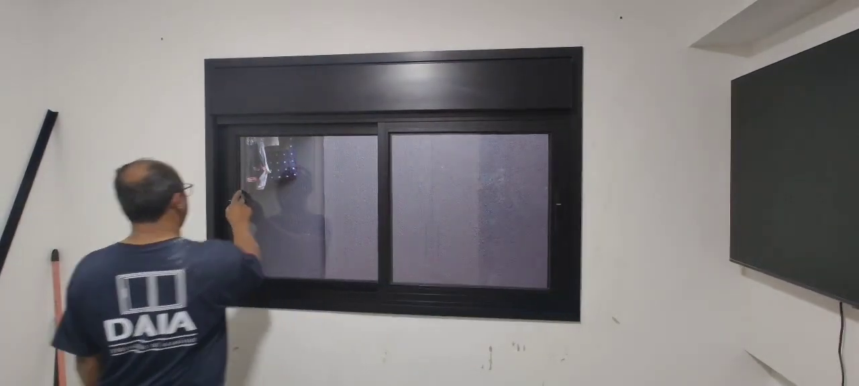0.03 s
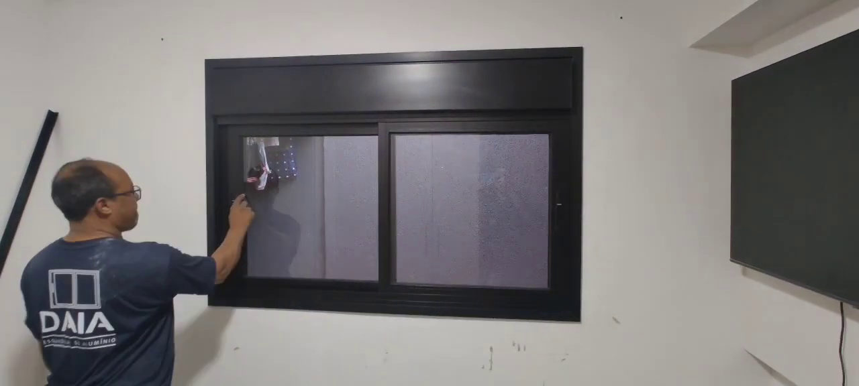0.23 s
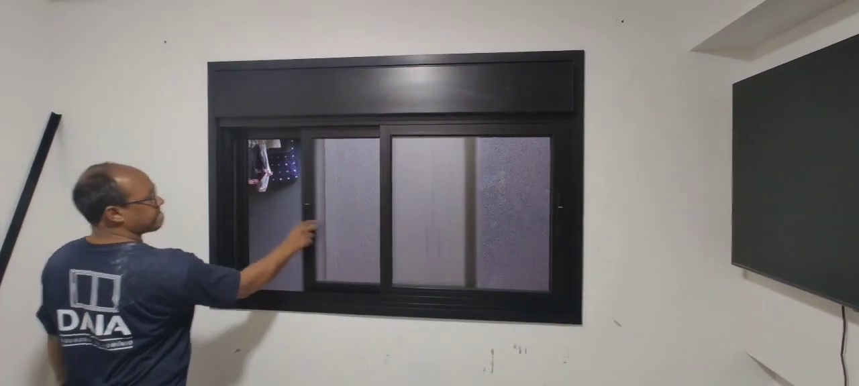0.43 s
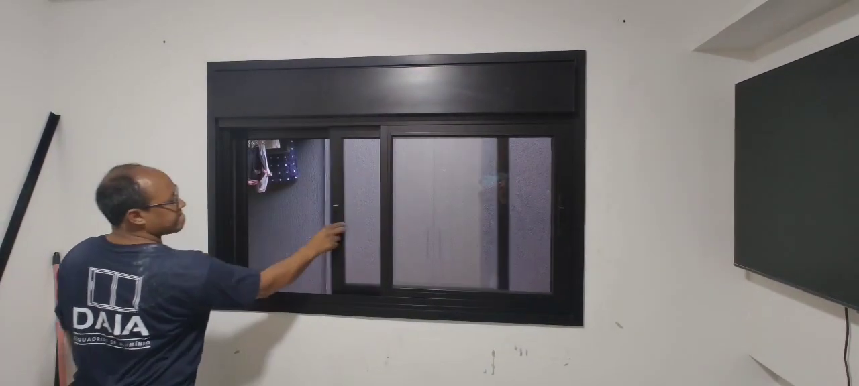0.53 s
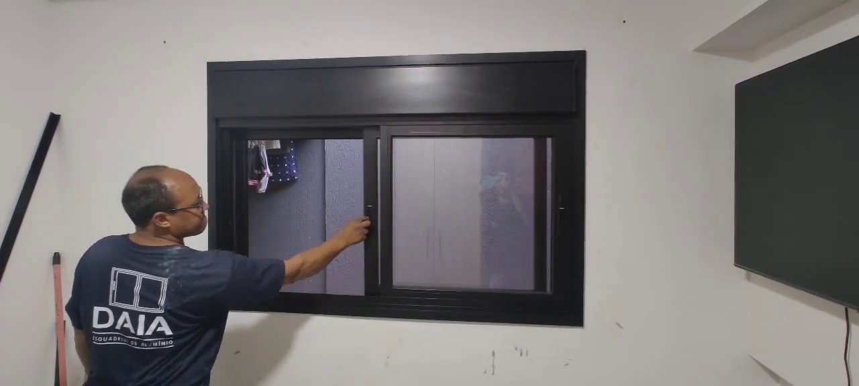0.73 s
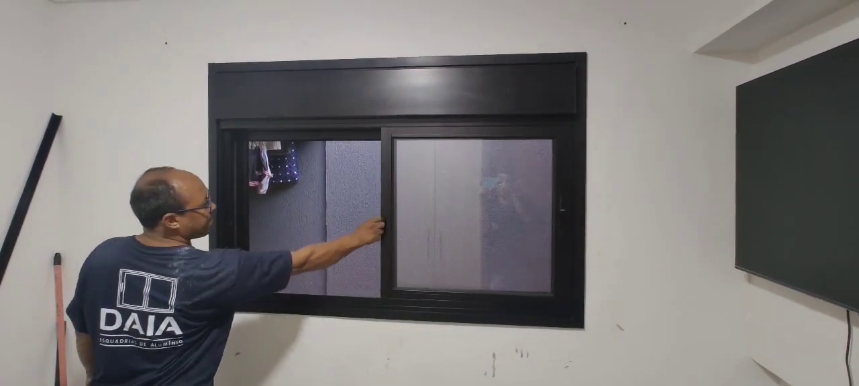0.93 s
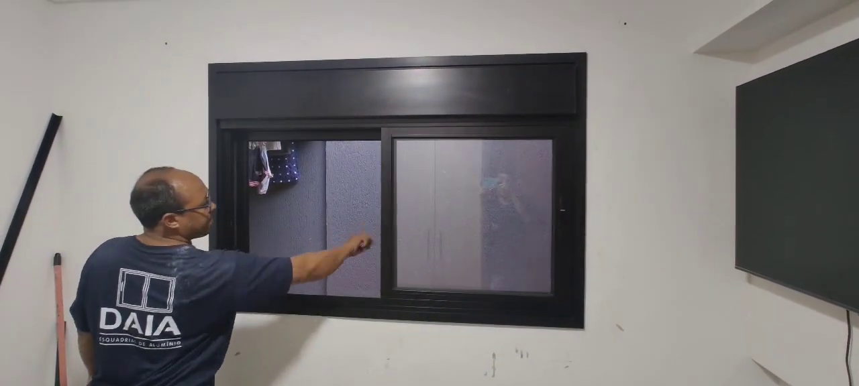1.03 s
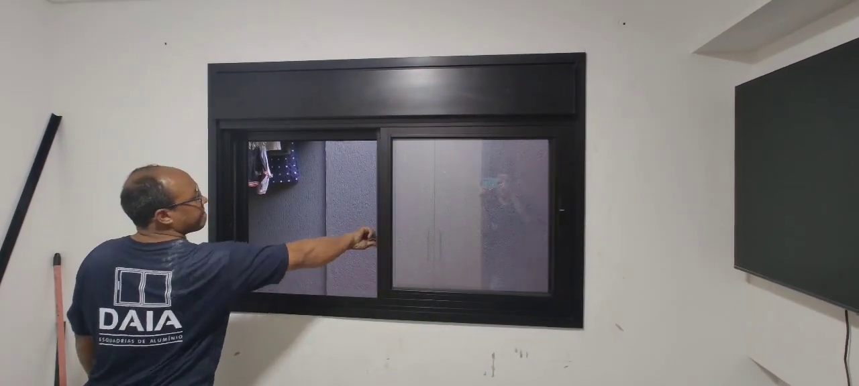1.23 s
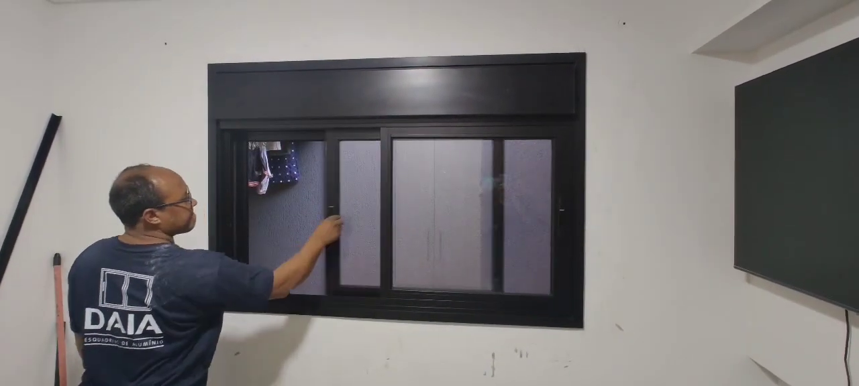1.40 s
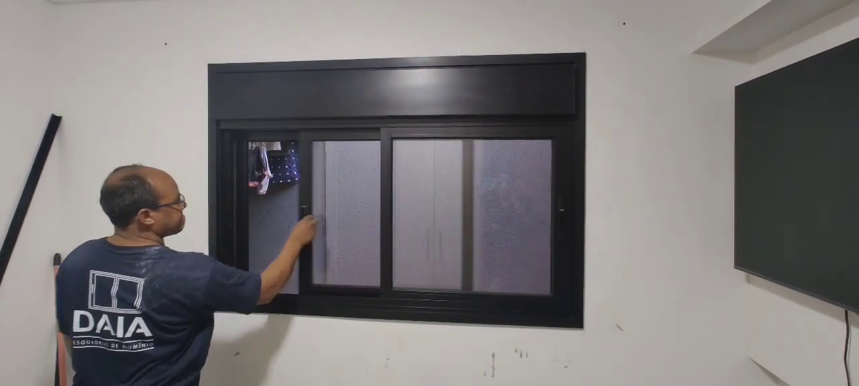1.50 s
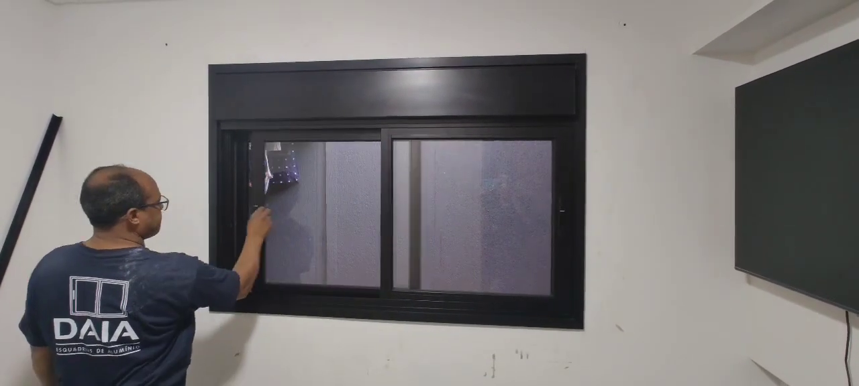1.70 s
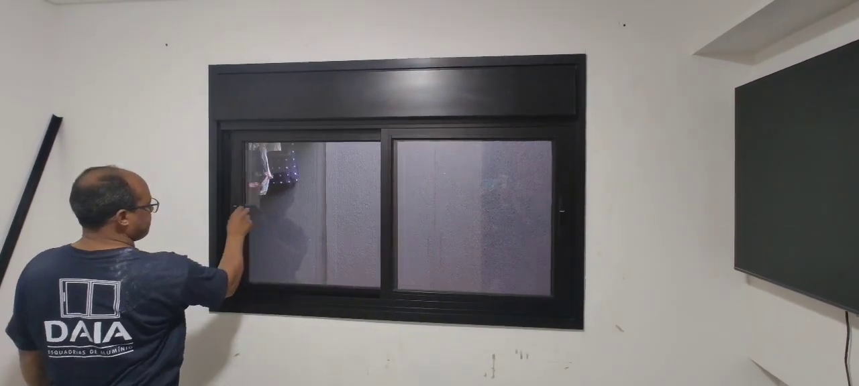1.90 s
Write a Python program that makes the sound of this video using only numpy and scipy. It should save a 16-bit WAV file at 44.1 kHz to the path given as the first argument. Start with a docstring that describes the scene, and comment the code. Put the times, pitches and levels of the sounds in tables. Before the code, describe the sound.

A metal window slides open and shut in a bare room. It clatters free, rolls with a gritty rumble and hiss, squeaks briefly, then rolls back and knocks into the frame. Heard on the right, a few metres away.

```python
"""A bare room: a metal window sash, a few metres off, slides open and shut.
A hand works the catch and the sash breaks free with a short clatter. Its rollers grate and rumble
on the track, its brush seal hisses, its weight thumps the frame. A roller squeaks late in the
opening; on the way back the sash knocks into the frame. All on the right; faint hiss on the left."""
import sys
import numpy as np
from scipy import signal
from scipy.fft import rfft, irfft
from scipy.io import wavfile
from scipy.ndimage import uniform_filter1d

SR = 44100
rng = np.random.default_rng(int(sys.argv[2]) if len(sys.argv) > 2 else 0)


def store_wav(level_fs):
    """Save 16-bit WAV to argv[1]."""
    pcm = np.round(np.clip(np.atleast_2d(level_fs), -1, 1) * 32767)
    wavfile.write(sys.argv[1], SR, pcm.T.astype(np.int16))


N = 85995
TIME = np.arange(N) / SR

# modes of sash and pane: f/Hz, width/Hz, level/dB
SASH_MODES = [(222.2, 17, 5.5), (267, 20, 0.5), (385.3, 26, -1.5), (505, 50, -0.5), (600, 52, -2),
              (762, 10, -7.5), (1462, 47, -5), (1896, 48, -4.5), (2028, 68, -6.5), (2834, 44, -4.5),
              (3870, 73, -5)]
# spectrum of contacts on the sash: f/Hz, level/dB
CONTACT_SPECTRUM = [(40, -42), (120, -25), (220, -12), (450, -11.5), (750, -1.5), (1100, -5.5), (2000, -3),
                    (2900, -1.5), (4600, -4.5), (6000, -0.5), (7500, -5.5), (10000, -11.5), (13000, -20),
                    (15700, -35)]


def amp(db):
    """Decibels to gain."""
    return 10 ** (np.asarray(db) / 20)


def unit(x):
    """Scale to rms 1."""
    return x / np.sqrt(np.mean(x ** 2) + 1e-20)


def log_interp(points, hz):
    """Interpolate a table over log frequency."""
    f, value = np.transpose(points)
    return np.interp(np.log(hz + 1), np.log(f + 1), value)


def envelope(rows, column=1):
    """Gain over time from a dB column; silent outside the table."""
    rows = np.array(rows)
    return amp(np.interp(TIME, rows[:, 0], rows[:, column], left=-140, right=-140))


def colour(x, spectrum, modes=(), tilt_db_oct=0):
    """Filter by a tilted spectrum and resonant modes; output rms 1."""
    hz = np.fft.rfftfreq(2 * N, 1 / SR)
    octaves = np.log2(np.maximum(hz, 200) / 1000)
    gain = amp(log_interp(spectrum, hz) + tilt_db_oct * octaves)
    resonance = 1 + sum(amp(db) / (1 + 2j * (hz - f) / width) for f, width, db in modes)
    return unit(irfft(rfft(x, 2 * N) * gain * resonance)[:N])


def impacts(per_s, spread_db):
    """Random tiny impacts of uneven size."""
    size = amp(spread_db * np.minimum(rng.exponential(1, N), 4))
    return unit(size * rng.choice([-1, 1], N) * (rng.random(N) < per_s / SR))


def wander(cutoff_hz):
    """Low-passed noise, rms 1."""
    return unit(signal.sosfilt(signal.butter(2, cutoff_hz, fs=SR, output="sos"), rng.standard_normal(N)))


def background():
    """Quiet, steady noise, mostly low."""
    # f/Hz, level/dB
    spectrum = [(25, -53), (90, -12), (150, 9), (280, 5), (450, 4.5), (800, -2.5), (1200, -3),
                (3000, -13.5), (7000, -8), (11000, -19.5), (15700, -25)]
    return amp(-65) * colour(rng.standard_normal(N), spectrum)


def handling():
    """Hand and catch rub faintly on the sash."""
    # work at the catch, then a change of grip between strokes: t/s, level/dB
    rubbing = [(0, -53), (0.06, -60.5), (0.12, -54), (0.165, -59), (0.19, -48.5), (0.22, -40), (0.3, -86),
               (1.115, -74), (1.155, -60), (1.19, -80)]
    return envelope(rubbing) * colour(impacts(per_s=5000, spread_db=2.1), CONTACT_SPECTRUM, SASH_MODES)


def frame_rings(rise_s=0.01, jitter=0.044):
    """Single frame modes ring as the sash is gripped, freed and stopped."""
    # t/s, f/Hz, level/dB, t60/s
    rings = [(0.04, 880, -52, .15), (0.193, 776, -39, 0.2), (0.99, 885, -58, 0.74)]
    out = np.zeros(N)
    for start, hz, db, t60 in rings:
        age = np.maximum(TIME - start, 0)
        phase = 2 * np.pi * np.cumsum(hz * (1 + jitter * wander(55))) / SR
        out += amp(db - 60 * age / t60) * np.minimum(age / rise_s, 1) * np.sin(phase)
    return out


def knocks():
    """Sash and catch knock: each a dying clatter of contacts that rings the sash."""
    # t/s, level/dB, rise/s, t60/s, tilt/(dB/octave), cutoff/Hz
    hits = [(0.066, -45, 0.018, 0.17, 1.5, 10000), (0.190, -27.5, .018, 0.19, -0.5, 10900),
            (0.223, -29, 0.0099, 0.24, 1, 2920), (1.222, -45.5, 0.016, 0.055, -1, 6040),
            (1.399, -38, 0.0033, 0.05, 0, 8000), (1.650, -31, 0.0027, 0.064, 3, 15000),
            (1.792, -42.5, 0.0026, .06, -1, 8000)]
    out = np.zeros(N)
    for start, db, rise, t60, tilt, cutoff in hits:
        age = TIME - start
        shape = np.clip(age / rise, 0, 1) ** 2 * amp(-60 * np.maximum(age - rise, 0) / t60)
        contacts = signal.lfilter(*signal.butter(2, cutoff, fs=SR), impacts(per_s=14000, spread_db=0.74))
        out += amp(db) * shape * colour(contacts, CONTACT_SPECTRUM, SASH_MODES, tilt)
    return out


def bristles(tilt_db_oct=0):
    """Dense flicks of the brush seal merge into hiss."""
    # f/Hz, level/dB
    spectrum = [(100, -57), (1500, -34), (4000, -7), (5200, -4.5), (6200, -0.5), (6900, -0.5), (7800, -6.5),
                (9800, -11), (11000, -16.5), (13500, -23), (15700, -34)]
    return colour(impacts(per_s=20000, spread_db=2), spectrum, tilt_db_oct=tilt_db_oct)


def slide(sing_hz=7080, sing_width_hz=1050):
    """Grit and bumps under the rollers shake the sash; the seal brushes the frame."""
    # opening stroke: t/s, grating/dB, rumble/dB, seal/dB
    opening = [(0.28, -51, -50, -58), (0.308, -57.5, -48, -51.5), (0.326, -49, -53.5, -44.5),
               (0.414, -41.5, -44, -44), (0.45, -42.5, -47, -42), (0.49, -43, -41.5, -42.5),
               (0.574, -46, -51.5, -44), (0.672, -46.5, -54.5, -46), (0.782, -51, -61, -55),
               (0.854, -48, -57.5, -47.5), (0.894, -49, -54.5, -51), (0.932, -53.5, -64.5, -53.5),
               (0.958, -52.5, -65, -49.5), (0.994, -78, -67, -74), (1.038, -66, -67, -71),
               (1.1, -81, -69, -96)]
    # closing stroke: t/s, grating/dB, rumble/dB, seal/dB
    closing = [(1.22, -81, -73, -89), (1.232, -62, -63, -64.5), (1.25, -60.5, -56, -63.5),
               (1.288, -59, -65, -57.5), (1.31, -49.5, -59, -44.5), (1.362, -47, -46, -42),
               (1.408, -46.5, -40.5, -41.5), (1.43, -49, -48, -45), (1.642, -50, -52, -48),
               (1.652, -47, -44.5, -44.5), (1.704, -62.5, -67.5, -58.5), (1.806, -55.5, -54.5, -51.5),
               (1.876, -63.5, -78, -62.5), (1.908, -72, -79, -75), (1.92, -77, -92, -85),
               (1.95, -95, -76, -106)]
    # track grating: f/Hz, level/dB
    grit_spectrum = [(25, -52), (150, -24), (350, -1.5), (550, 5.5), (740, 8), (1000, 3.5), (1250, 0),
                     (1500, 3.5), (2100, 2.5), (3500, 0), (5000, -8), (9000, -33), (16000, -54)]
    # roller rumble: f/Hz, level/dB
    bump_spectrum = [(25, -59), (60, -18.5), (110, -13), (150, -2.5), (205, 0), (300, 1), (400, -5),
                     (700, -20), (2000, -38)]
    grating = colour(impacts(per_s=2500, spread_db=0), grit_spectrum, SASH_MODES)
    rumble = colour(impacts(per_s=500, spread_db=4.5), bump_spectrum, SASH_MODES)
    seal_opening = bristles()
    # stroked shut, the bristles sing and are brighter
    singing = unit(signal.lfilter(*signal.iirpeak(sing_hz, sing_hz / sing_width_hz, SR), bristles()))
    seal_closing = unit(bristles(tilt_db_oct=2.5) + amp(-2.5) * singing)
    return (amp(9) * grating * (envelope(opening, 1) + envelope(closing, 1))
            + amp(4) * rumble * (envelope(opening, 2) + envelope(closing, 2))
            + amp(7) * (seal_opening * envelope(opening, 3) + seal_closing * envelope(closing, 3)))


def thumps(rise_s=0.0042):
    """The sash's weight thumps the frame as it starts, stops or jolts."""
    # t/s, level/dB, t60/s
    jolts = [(0.309, -52.5, 0.086), (0.947, -48, 0.15), (1.667, -47.5, 0.087), (1.765, -52, 0.14)]
    # f/Hz, level/dB
    spectrum = [(25, -28), (60, -15), (110, -4), (150, 8.5), (230, -6.5), (400, -18), (800, -42),
                (3000, -60)]
    shape = np.zeros(N)
    for start, db, t60 in jolts:
        age = np.maximum(TIME - start, 0)
        shape += amp(db - 60 * age / t60) * np.minimum(age / rise_s, 1)
    return shape * colour(rng.standard_normal(N), spectrum)


def squeak(jitter=0.023, smear_hz=118, flutter_db=1.5):
    """Roller stick-slip: a tone that sags, jumps back up and turns hoarse."""
    # t/s, f/Hz, level/dB, roughness/(0-1)
    contour = [(0.702, 720, -55, 0.3), (0.737, 644.4, -39, .4), (0.75, 612.6, -46, 0.4),
               (0.753, 608.7, -31.5, 0.24), (0.769, 559.6, -27, 0.24), (0.779, 481, -34.5, 0.4),
               (0.782, 479, -28, 0.2), (0.794, 481.8, -26, .1), (0.812, 482.3, -33.5, 0),
               (0.832, 487, -50, 0.3), (0.846, 704, -43, 0.23), (0.877, 706, -41.5, .55),
               (0.916, 690, -41, 0.38), (0.939, 717, -39, 0), (0.948, 606, -52, 0.2),
               (0.965, 630, -88, 0.3)]
    times, hz, _, roughness = np.transpose(contour)
    pitch_hz = np.interp(TIME, times, hz) * (1 + jitter * wander(157))
    phase = 2 * np.pi * np.cumsum(pitch_hz) / SR
    clean = unit(np.sin(phase) + amp(-26) * np.sin(3 * phase))
    hoarse = unit(wander(smear_hz) * np.sin(phase) + wander(smear_hz) * np.cos(phase))
    rough = np.interp(TIME, times, roughness)
    tone = ((1 - rough) * clean + rough * hoarse) / np.hypot(1 - rough, rough)
    fluttering = unit(tone * amp(flutter_db * wander(130)))
    highpass = signal.butter(6, 410, "high", fs=SR, output="sos")
    return signal.sosfiltfilt(highpass, amp(5.5) * envelope(contour, 2) * fluttering)


def left_hiss(right, floor_db=-75, swell_db=-66.5, knee_db=-36.5):
    """Faint hiss that swells when the right channel is loud."""
    # f/Hz, level/dB
    spectrum = [(25, -32), (60, -6.5), (125, 12.5), (250, 10), (600, 6.5), (1200, 2.5), (3000, -0.5),
                (8000, -2), (14000, -3.5), (15700, -14)]
    right_rms = np.sqrt(abs(uniform_filter1d(right ** 2, size=900)))
    swell = amp(swell_db) * np.tanh(right_rms / amp(knee_db))
    return np.hypot(swell, amp(floor_db)) * colour(rng.standard_normal(N), spectrum)


def room(x, tail_db, echoes=10, echo_span_s=0.018, echo_re_tail_db=-14.5):
    """Direct sound, wall echoes and a tail that dies soonest in the top treble."""
    # f/Hz, t60/s
    decay = [(150, 0.6), (600, 0.25), (2500, 0.47), (7000, 0.35), (15000, 0.16)]
    hz, t, noise = signal.stft(rng.standard_normal(SR // 2), SR, nperseg=256)
    tail = signal.istft(noise * amp(-60 * t / log_interp(decay, hz)[:, None]), SR, nperseg=256)[1]
    tail *= np.minimum(np.arange(len(tail)) / SR / 0.0033, 1)
    response = amp(tail_db) * tail / np.linalg.norm(tail)
    delays = (rng.uniform(0.14, 1, echoes) * echo_span_s * SR).astype(int)
    response[delays] += amp(tail_db + echo_re_tail_db) * rng.choice([-1, 1], echoes) / np.sqrt(echoes)
    response[0] += 1
    return signal.fftconvolve(x, response / np.linalg.norm(response))[:N]


def scene():
    """Window, room and background on the right; hiss on the left."""
    right = room(slide() + handling() + thumps() + frame_rings(), tail_db=-9.5)
    right += room(knocks(), tail_db=-14)
    right += room(squeak(), tail_db=-14.5)
    right += background()
    return np.array([left_hiss(right), right])


def record(dry, cutoff_hz=15700):
    """Steep low-pass on both channels."""
    lowpass = signal.firwin(511, cutoff_hz, window=("kaiser", 9), fs=SR)
    return signal.oaconvolve(dry, lowpass[None], "same")


dry = scene()
out = record(dry)
store_wav(out)
```